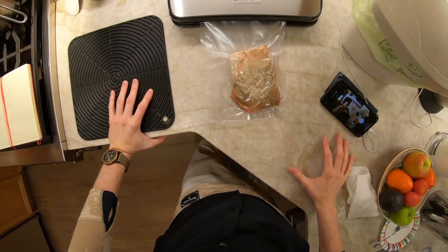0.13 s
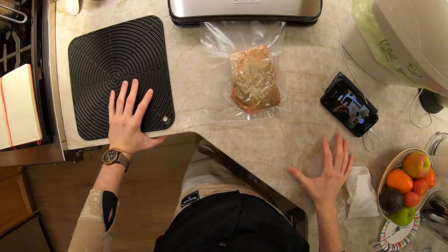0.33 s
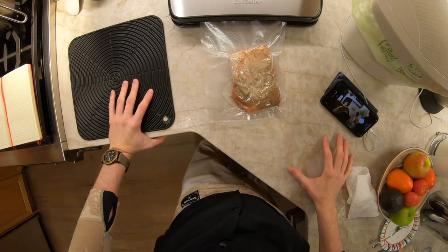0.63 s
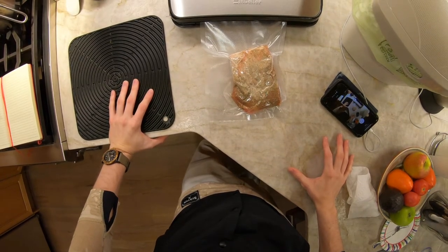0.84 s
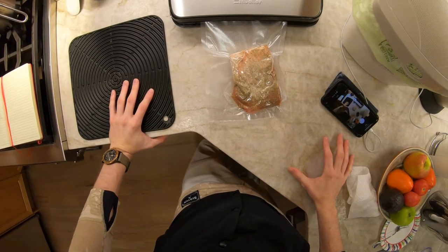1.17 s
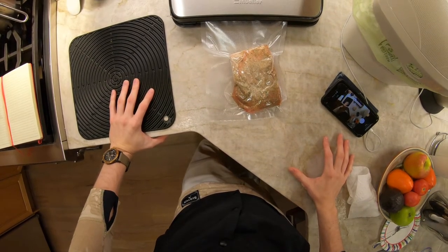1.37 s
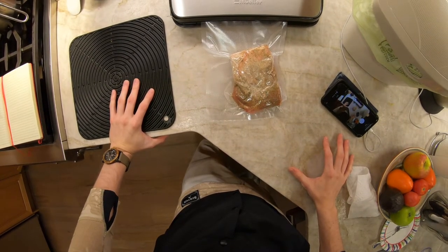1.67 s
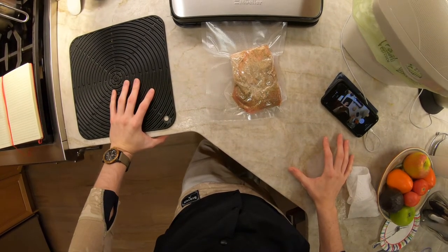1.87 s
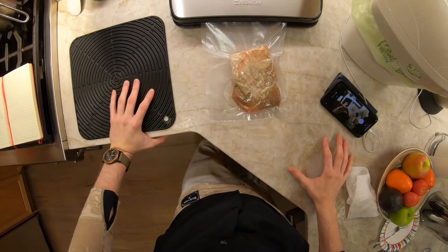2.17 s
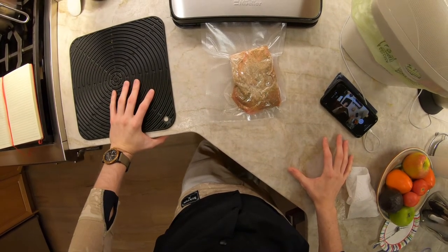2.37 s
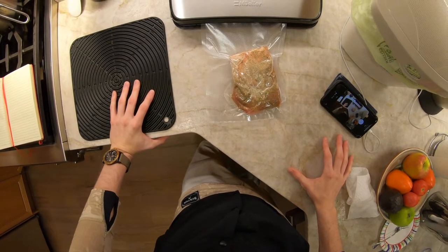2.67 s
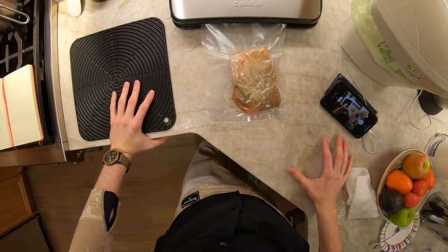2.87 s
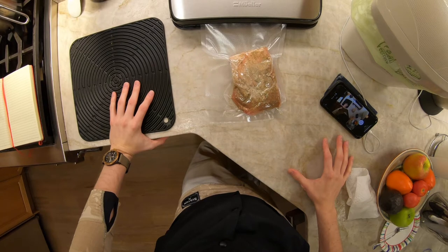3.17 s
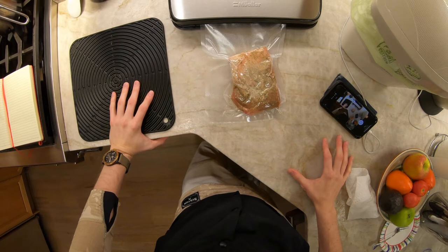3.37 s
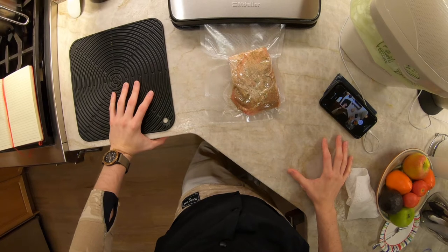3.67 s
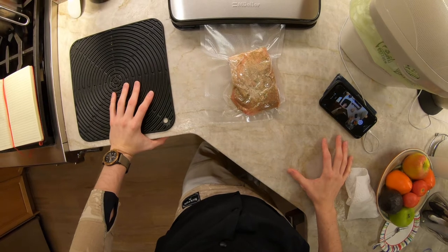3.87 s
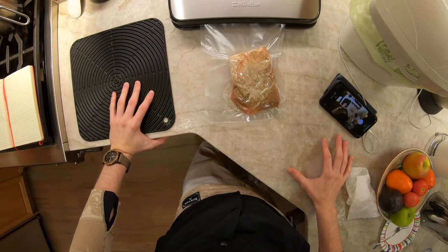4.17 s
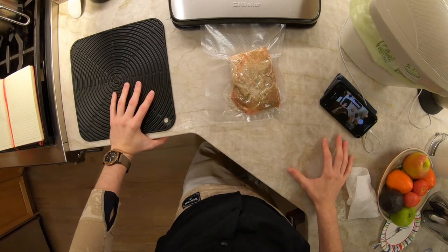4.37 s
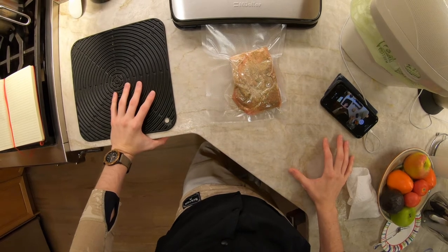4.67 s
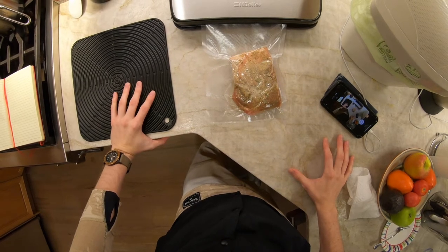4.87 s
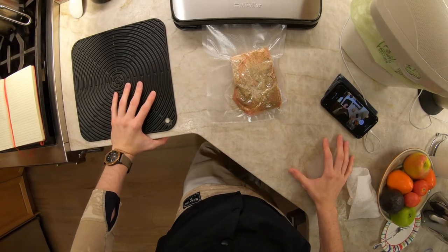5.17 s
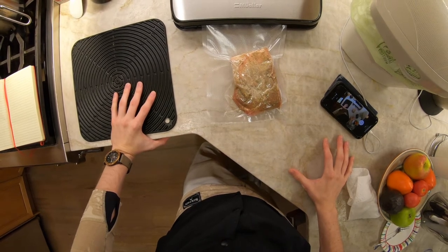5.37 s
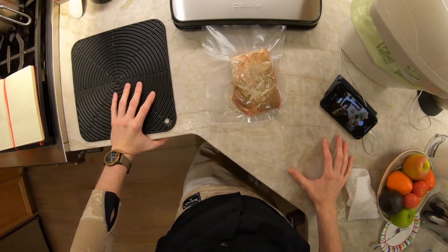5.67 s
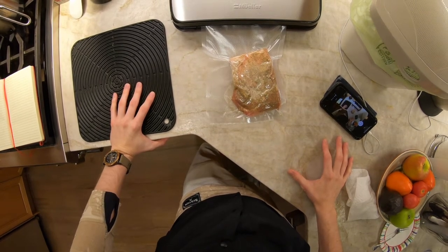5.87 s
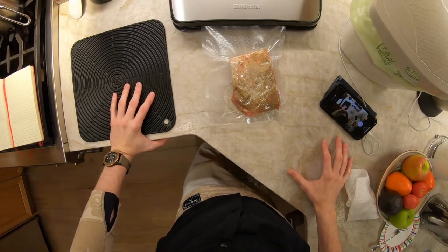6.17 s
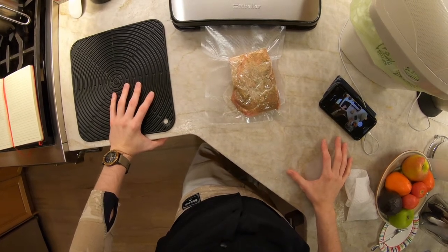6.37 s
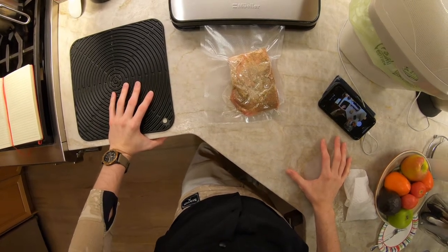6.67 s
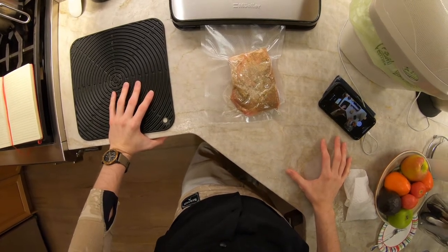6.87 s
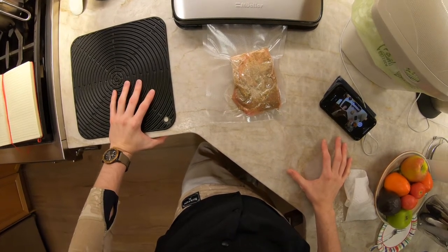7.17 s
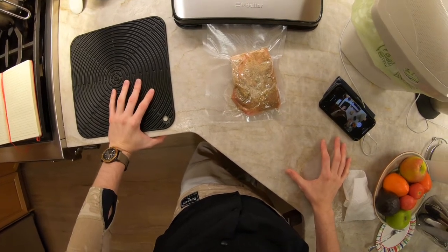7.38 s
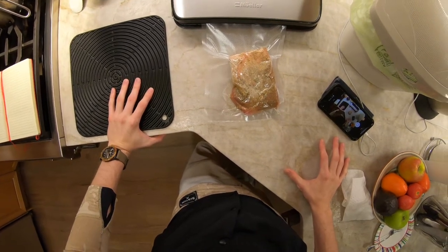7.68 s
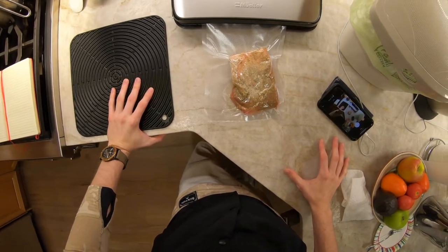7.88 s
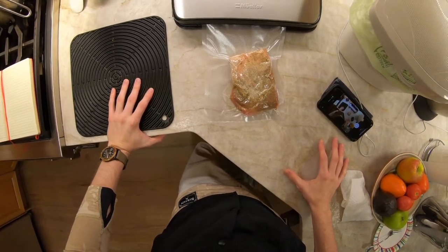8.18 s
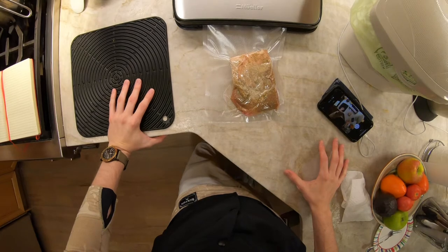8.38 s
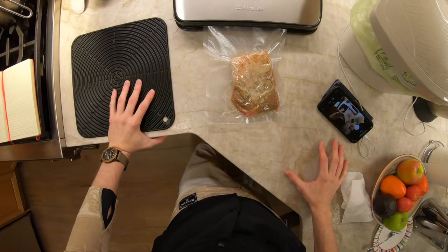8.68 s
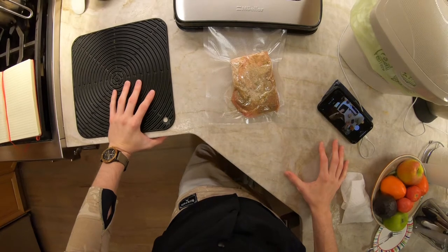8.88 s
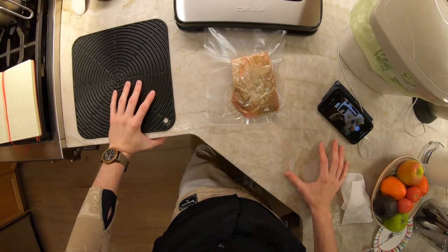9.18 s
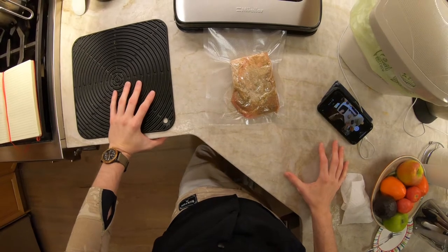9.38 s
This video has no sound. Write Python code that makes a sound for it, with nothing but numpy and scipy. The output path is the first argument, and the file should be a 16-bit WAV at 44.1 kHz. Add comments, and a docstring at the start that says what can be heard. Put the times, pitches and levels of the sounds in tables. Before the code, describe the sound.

A countertop vacuum sealer pump buzzes and rattles steadily in a kitchen, its plastic bag snapping early, then cuts off abruptly into faint whistle and hum.

```python
"""A countertop vacuum sealer empties a bag in a kitchen: a geared-down motor drives a piston pump at 27 strokes/s.
From the start each stroke knocks, spits air through a valve and thuds, as tones and noise locked to the crank.
The bag snaps as it tightens near 0.9 s, with fainter crackles later; a thin whistle of filtered noise sets in
near 4.2 s as the motor takes more load. The pump cuts out near 7.3 s; whistle and deep hum stay."""
import sys
import numpy as np
from scipy import signal
from scipy.fft import rfft, irfft, next_fast_len
from scipy.io import wavfile
from scipy.ndimage import map_coordinates

SR = 44100
rng = np.random.default_rng(int(sys.argv[2]) if len(sys.argv) > 2 else 0)


def transcribe(signal):
    """Save signal, clipped to [-1, 1], as a 16-bit WAV file at the path in sys.argv[1]."""
    frames = np.atleast_2d(signal).T
    limited = np.clip(frames, -1, 1)
    pcm = np.round(limited * 32767).astype(np.int16)
    wavfile.write(sys.argv[1], SR, pcm)


N = 419832

# crank speed under power: t/s, speed/(turns/s)
SPEED = [(0, 26.824), (.3, 26.755), (1.2, 27.182), (3.9, 27.463), (4.7, 27.153), (5.6, 27.181),
         (7.28, 27.078)]
GEARING = 25 / 7  # motor turns per crank turn
# blows of a crank turn: onset/turn, rise/turn, hold/turn, fall/turn, level over the rest of the turn/dB
THUD = (0.135, .06, 0.053, 0.072, 0.84)
KNOCK = (0.598, 0.079, .04, 0.14, 2.1)
PUFF = (0.707, 0.065, 0.16, 0.31, 8.9)
RING = (0.6, 0.2, 0.5, 0.5, -5)


def amp(db):
    """Decibels to gain."""
    return 10 ** (np.asarray(db) / 20)


def unit(x):
    """x at rms 1."""
    return x / np.sqrt(np.mean(x ** 2) + 1e-20)


def along(points, hz):
    """(f/Hz, value) points read on a log frequency axis."""
    f, v = np.transpose(points)
    return np.interp(np.log(hz + 1), np.log(f), v)


def curve(rows):
    """(t/s, value) rows as one value per sample."""
    return np.interp(np.arange(N) / SR, *np.transpose(rows))


def wobble(rate_hz):
    """Smooth random curve, rate_hz knots a second."""
    knots = rng.standard_normal(int(N * rate_hz / SR) + 4)
    return map_coordinates(knots, [np.arange(N) * rate_hz / SR])


def filtered(x, response):
    """x times a response of frequency."""
    size = next_fast_len(N + SR // 2)
    return irfft(rfft(x, size) * response(np.fft.rfftfreq(size, 1 / SR)), size)[:N]


def resonance(f, hz, width):
    """Response of one damped mode."""
    return 1j * f * width / (hz * hz - f * f + 1j * f * width)


def peaks(modes, f):
    """Joint strength of (f/Hz, width/Hz, level/dB) modes, added in power."""
    return np.sqrt(sum(np.abs(amp(db) * resonance(f, hz, width)) ** 2 for hz, width, db in modes))


def ringing(x, gain, size=8192):
    """x through a causal (minimum-phase) body with the given gain over frequency."""
    cepstrum = irfft(np.log(gain(np.fft.rfftfreq(size, 1 / SR)) + 1e-6))
    cepstrum[1:size // 2] *= 2  # fold onto positive time
    cepstrum[size // 2 + 1:] = 0
    impulse = irfft(np.exp(rfft(cepstrum)))
    return signal.fftconvolve(x, impulse)[:N]


def looped(cycle, turn):
    """One cycle of sound, repeated at every turn of a shaft."""
    return map_coordinates(cycle, [turn % 1 * len(cycle)], mode="grid-wrap")


def random_cycle(size):
    """Flat-spectrum noise cycle with random phases."""
    return irfft(np.exp(2j * np.pi * rng.random(size // 2 + 1)))


def background():
    """Soft kitchen noise and wavering hum; a very deep drone comes up once the pump is off."""
    # kitchen hum: f/Hz, level/dB rms
    hum_tones = [(56.5, -54), (87.5, -57.5), (177, -63), (230, -68.5), (512, -71.5)]
    # kitchen noise spectrum: f/Hz, relative density/dB
    noise_points = [(20, -8), (45, -8.5), (70, -15), (100, -18.5), (140, -26), (200, -27), (300, -34),
                    (600, -33), (850, -39.5), (1500, -43.5), (2500, -48.5), (6000, -53), (15500, -46.5)]
    t = np.arange(N) / SR
    white = rng.standard_normal(N)
    noise = amp(-49.5) * unit(filtered(white, lambda f: amp(along(noise_points, f)) * f / np.hypot(f, 20)))
    hum = np.zeros(N)
    for hz, db in hum_tones:
        hum += amp(db) * np.sqrt(2) * np.sin(2 * np.pi * hz * t + 0.94 * wobble(6))
    drone = np.sqrt(2) * np.sin(2 * np.pi * 27.1 * t + 0.175 * wobble(6))
    drone *= amp(-37.5 + 0.49 * wobble(10))
    return noise + hum + drone * curve([(7.33, 0.11), (7.42, 0.87)])


def kitchen(x):
    """The room's answer: decaying noise, each frequency dying at its own speed."""
    # reverberation: f/Hz, t60/s
    decay_points = [(150, 0.2), (1200, 0.53), (4000, 0.44), (9000, 0.31), (15000, 0.033)]
    hz, t, z = signal.stft(rng.standard_normal(SR // 2), SR, nperseg=256)
    decay = amp(-60 * t / along(decay_points, hz)[:, None])
    tail = signal.istft(z * decay, SR, nperseg=256)[1]
    delayed = np.pad(unit(tail), (SR // 200, 0))  # 5 ms
    return signal.fftconvolve(x, delayed / np.sqrt(len(tail)))[:N]


def whistle():
    """Air seeps through a narrow gap: noise in a cluster of thin, high resonances, swelling in and holding."""
    # gap resonances: f/Hz, width/Hz, relative level/dB
    gap_modes = [(10860, 120, -8), (11500, 250, -8), (11900, 260, -0.5), (12500, 70, -1), (12500, 110, -8),
                 (12950, 230, -3), (13286, 120, -15), (13660, 97, -3), (14170, 90, -13), (14300, 150, -10)]
    start_s, rise_s, level_db = 4.22, .16, -50
    opening = np.clip((np.arange(N) / SR - start_s) / rise_s, 0, 1)
    white = rng.standard_normal(N)
    tones = filtered(white, lambda f: peaks(gap_modes, f) * resonance(f, hz=12630, width=4300) ** 2)
    return amp(level_db) * opening * unit(tones)


def bag():
    """The plastic gives way: resonant noise bursts with crackle, decaying exponentially."""
    # snaps: t/s, body level/dB, body f/Hz, t60/s, crackle level re body/dB
    snap_rows = [(.882, -20, 1400, .05, -1), (.884, -13, 770, .065, -12), (2.735, -31, 600, .15, -25),
                 (5.066, -28, 600, .15, -25), (9.262, -66, 700, .2, 2), (9.385, -66, 700, .2, 6)]
    out, t = np.zeros(N), np.arange(N) / SR
    for s, db, hz, t60, crackle_db in snap_rows:
        body = unit(filtered(rng.standard_normal(N), lambda f: resonance(f, hz, width=370) ** 2))
        crackle = unit(filtered(rng.standard_normal(N), lambda f: resonance(f, hz=3000, width=16000)))
        envelope = (t >= s) * amp(db - 60 * np.abs(t - s) / t60)
        out += envelope * (body + amp(crackle_db) * crackle)
    return out


def coasting():
    """Share of running speed: 1 until the power is cut, then friction brings the crank to rest."""
    off_s, coast_s, exponent = 7.271, .16, .9
    return np.clip(1 - (np.arange(N) / SR - off_s) / coast_s, 0, 1) ** exponent


def blow(turn, onset, rise, hold, fall, db):
    """A gain that rises once a turn, holds and dies away, at rms 1."""
    age = (turn - onset) % 1
    pulse = np.minimum(age / rise, 1) * np.exp(-np.maximum(age - rise - hold, 0) / fall)
    return unit(1 + amp(db) * pulse)


def throb(x, turn, depth):
    """Motor and crank drift in and out of step about 3.8 times/s, so the casing's main resonance swells."""
    slip = (2 * GEARING - 7.0017) * (turn - 31.2)
    casing = filtered(x, lambda f: resonance(f, hz=921, width=63))
    return x + depth * np.cos(2 * np.pi * slip) * casing


def valve_air(turn, size=1620):
    """Each stroke spits a puff of noise, broken up by sharp valve-flap flutters, partly alike every time."""
    # resonances excited by the air: f/Hz, width/Hz, relative level/dB
    valve_modes = [(2697, 52, -1.5), (2873, 66, 0.5), (3050, 103, -4), (3514, 97, 2), (3785, 63, 2.5),
                   (4143, 57, 0), (4450, 81.4, 0), (4825, 125, -1.5), (5150, 40, -5.5), (8810, 170, -7.5),
                   (9460, 100, -7.5), (9430, 81, -8.5), (9740, 200, -10.5)]
    # broad rush: f/Hz, relative density/dB
    rush_points = [(1200, -31), (2300, -28.5), (2700, -11), (4900, -12.5), (5500, -11.5), (6600, -20),
                   (7500, -16.5), (8200, -16.5), (9600, -14), (10500, -16.5), (12500, -29.5), (15700, -37)]
    flap_rate_hz, flap_decay_s = 450, 0.0053
    flaps = (rng.random(N) < flap_rate_hz / SR) * (.5 + rng.random(N))
    flutter = unit(signal.lfilter([1], [1, -np.exp(-1 / (flap_decay_s * SR))], flaps))
    puff = blow(turn, *PUFF) ** 1.11 * amp(0.216 * wobble(40)) * (1 + 0.09 * flutter)
    rattle = unit(looped(random_cycle(size), turn))  # the same at every stroke
    air = rng.standard_normal(N) + 0.77 * rattle
    spray = ringing(air * puff, lambda f: np.hypot(peaks(valve_modes, f), amp(along(rush_points, f))))
    return amp(-29.5) * unit(spray)


def gears(turn, size=11340):
    """Teeth chatter, harder under each stroke; the commutator whines ten times a motor turn."""
    # gear and casing chatter: f/Hz, relative density/dB
    chatter_points = [(60, -14.5), (210, -16.5), (360, -5), (480, -7.5), (610, -12), (760, -4), (880, -10),
                      (935, 6.5), (995, -7), (1480, -6.5), (1690, -13.5), (1850, -6), (2200, -21),
                      (2450, -14.5), (3000, -31)]
    knock, valve = blow(turn, *KNOCK), blow(turn, *PUFF)
    meeting = turn / 7  # the same teeth meet again every seventh crank turn
    teeth = unit(looped(random_cycle(size), meeting)) + 0.59 * rng.standard_normal(N)
    low = filtered(teeth, lambda f: f < 1150)
    blows = low * valve ** 0.39 + (teeth - low) * knock ** 0.47
    chatter = unit(ringing(blows, lambda f: amp(along(chatter_points, f))))
    whine = unit(np.sin(2 * np.pi * 10 * GEARING * turn) * valve ** .5)
    return amp(-31.0) * chatter + amp(-43.5) * whine


def pump_tones(turn, load, size=1024, count=3):
    """Harmonics of the crank, phased into thud, ring and knock; colour shifts from slack to drawn-in to tight bag."""
    # strongest tones, set at the nearest crank harmonic: f/Hz, level running free/dB, level at full load/dB
    orders = [(27, -35.5, -36.5), (82, -38.5, -41), (109, -39, -39.5), (136, -48.5, -47), (353, -46.5, -37),
              (381, -39, -59), (516, -51.5, -42.5), (761, -43.5, -36.5), (815, -38.5, -38),
              (925, -32, -35.5), (952, -33.5, -32), (1115, -43.5, -36.5), (1468, -40, -37.5),
              (1503, -43.5, -41), (1969, -43.5, -44.5)]
    # envelope of the weaker harmonics: f/Hz, level/dB
    buzz = [(54, -63), (170, -67), (220, -60), (500, -59), (610, -61), (900, -53.5), (1150, -44),
            (1280, -63), (1560, -42.5), (1690, -77.5), (1850, -55), (2050, -57), (2250, -80), (2450, -60.5)]
    # casing resonances that lift the weaker harmonics: f/Hz, width/Hz, level/dB
    casing_modes = [(279, 46, -45), (473, 30, -49.5), (807, 46, -39.5), (1040, 60, -44.5),
                    (1215, 41, -46.5), (1402, 43, -43.5), (1616, 26, -51), (1845, 31, -43.5),
                    (2130, 27, -56)]
    # resonances only while air flows freely from the slack bag: f/Hz, width/Hz, level/dB
    slack_modes = [(190, 10, -44), (330, 17, -44), (425, 27, -50), (538, 30, -41.5), (1460, 38, -41.5)]
    # blow that shakes each band most: from f/Hz, to f/Hz, blow
    band_rows = [(0, 650, THUD), (650, 880, KNOCK), (880, 1070, RING), (1070, 1250, THUD),
                 (1250, 2500, KNOCK)]
    slack_end_s, slack_fade_s = 1.5, 1.1
    hz = np.arange(size // 2 + 1) * np.median(np.transpose(SPEED)[1])
    angle = np.arange(size) / size
    bands = [((hz >= low) & (hz < high), blow(angle, *shape)) for low, high, shape in band_rows]
    phase = np.exp(2j * np.pi * rng.random(len(hz)))
    tone_hz, free_db, loaded_db = np.transpose(orders)
    slack = np.clip((slack_end_s - np.arange(N) / SR) / slack_fade_s, 0, 1)
    states = [
        (slack, free_db, slack_modes),
        ((1 - slack) * (1 - load), free_db, []),
        ((1 - slack) * load, loaded_db, []),
    ]
    out = np.zeros(N)
    for share, strong_db, flow_modes in states:
        level = np.hypot(amp(along(buzz, hz)), peaks(casing_modes, hz))
        level[np.rint(tone_hz / hz[1]).astype(int)] = amp(strong_db)
        level = np.hypot(level, peaks(flow_modes, hz)) * (hz > 0) * (hz < buzz[-1][0])
        lines = level * phase
        for _ in range(count):  # the tones of each band line up where its blow falls
            lines = sum(band * rfft(irfft(lines * band) * gain) for band, gain in bands)
            lines = level * np.exp(1j * np.angle(lines))
        out += share * looped(irfft(lines) * size / np.sqrt(2), turn)
    return out


def scene():
    """The sealer on the counter, in the kitchen."""
    # pump load against the vacuum: t/s, load/(0-1)
    load_rows = [(1.05, 0), (2.3, 0), (3.1, 0.22), (4.15, 0.63), (4.5, 0.76)]
    running = coasting()
    turn = np.cumsum(curve(SPEED) * running) / SR - .099
    turn = turn + 0.00039 * wobble(30)  # the crank never turns quite evenly
    drive = amp(-0.38) * running ** 1.42  # slower strokes are weaker
    load = np.clip(curve(load_rows), 0, 1)
    tones = amp(0.84) * throb(pump_tones(turn, load), turn, depth=0.34) * drive ** 1.9
    chatter = throb(gears(turn), turn, depth=0.28) * drive
    air = valve_air(turn) * drive ** 1.77  # the air fades faster than the gears
    snaps = bag()
    knocks = filtered(tones, lambda f: resonance(f, hz=1402, width=640) ** 2)
    room = kitchen(amp(-3.0) * chatter + amp(-10) * knocks + amp(-10) * air + amp(-7) * snaps)
    return (tones + chatter + air + snaps + room + whistle() + background())[None]


def record(dry):
    """Band limit: nothing from 15.8 kHz up is kept."""
    return filtered(dry[0], lambda f: f < 15800)[None]


dry = scene()
out = record(dry)
transcribe(out)
```